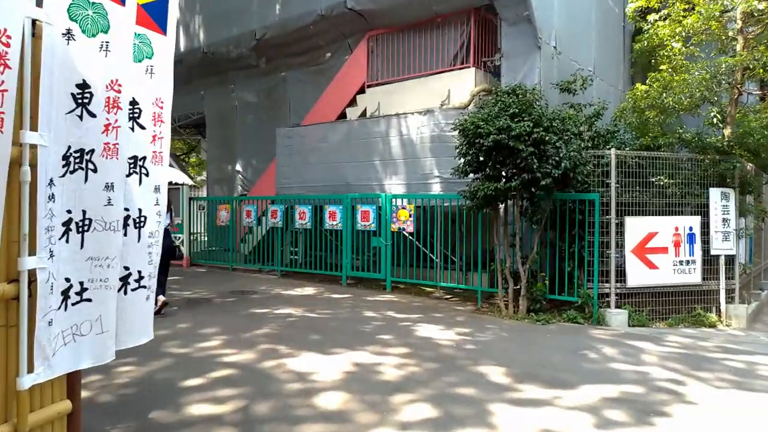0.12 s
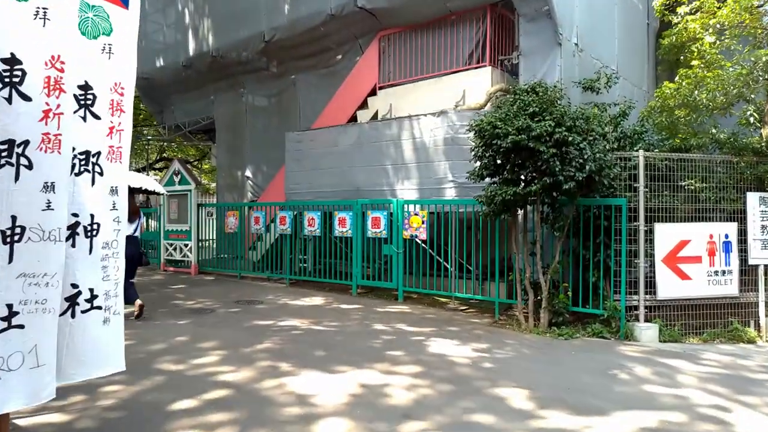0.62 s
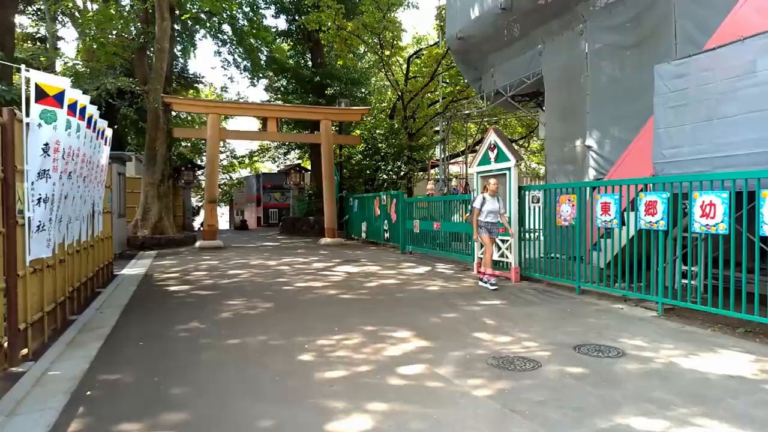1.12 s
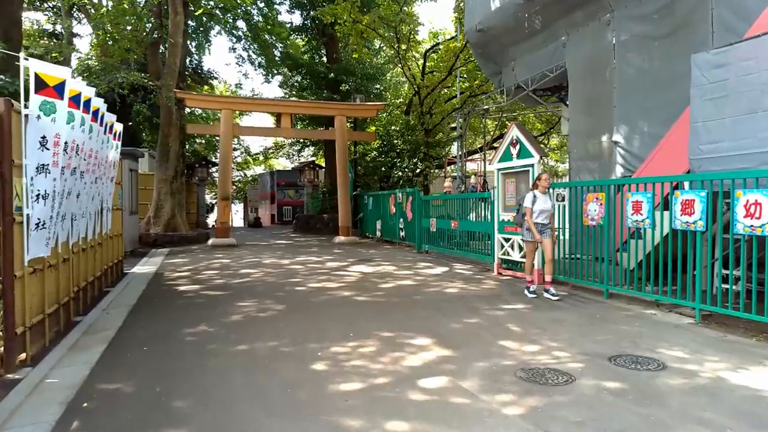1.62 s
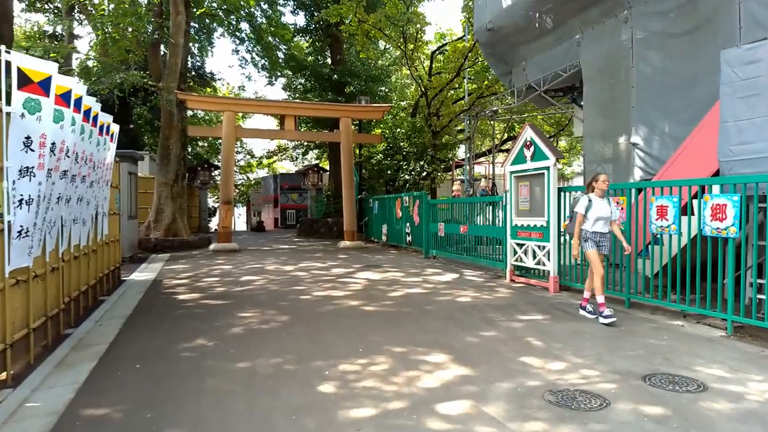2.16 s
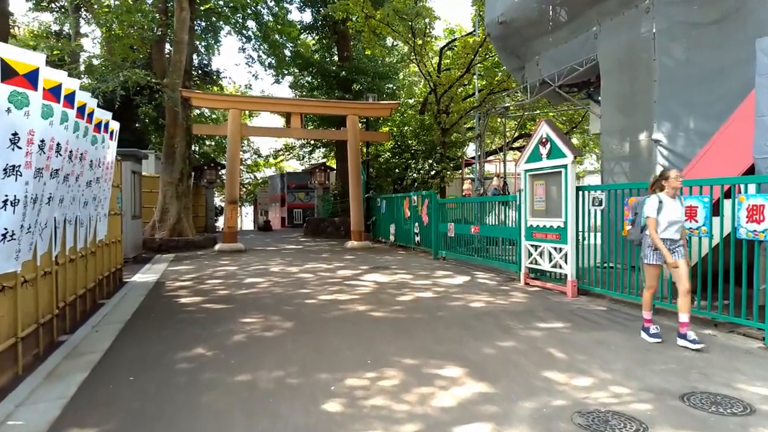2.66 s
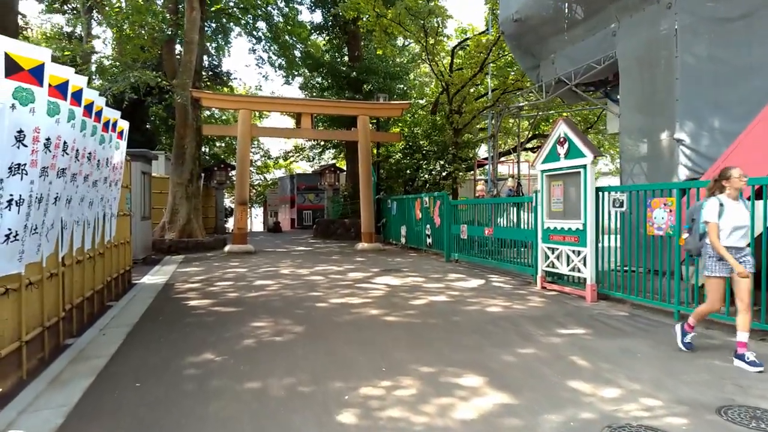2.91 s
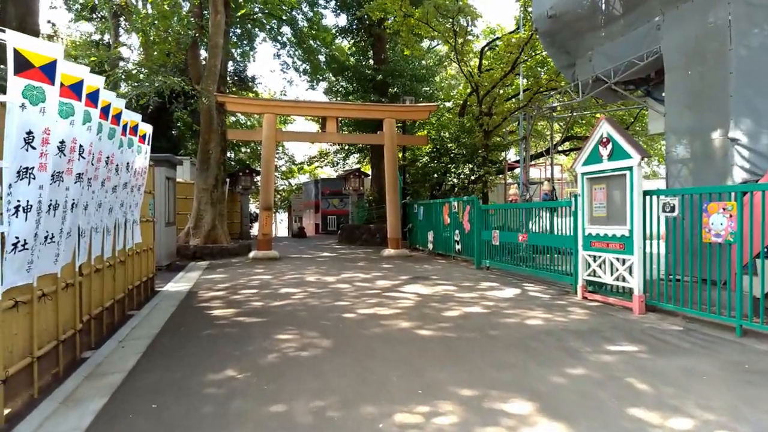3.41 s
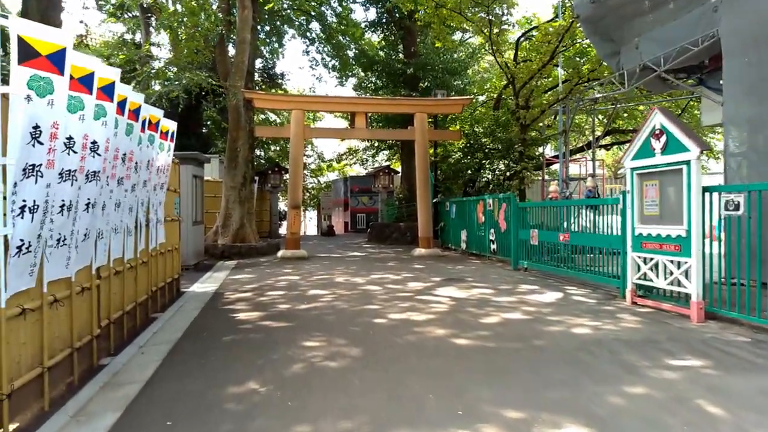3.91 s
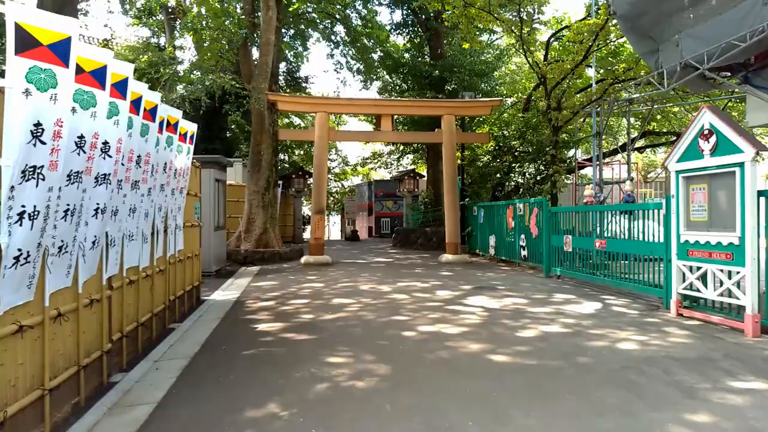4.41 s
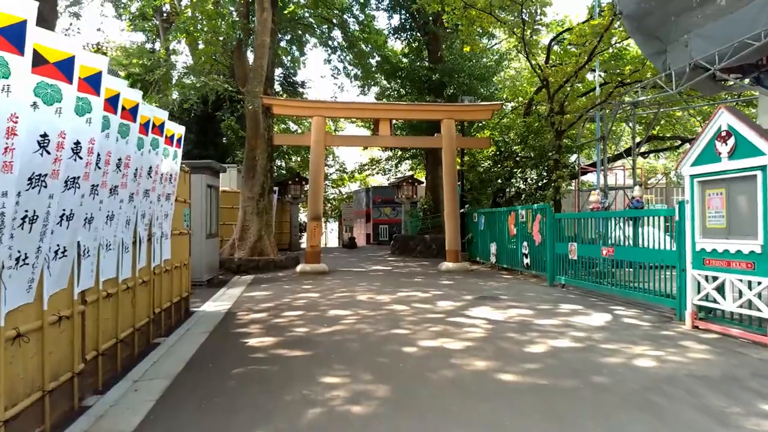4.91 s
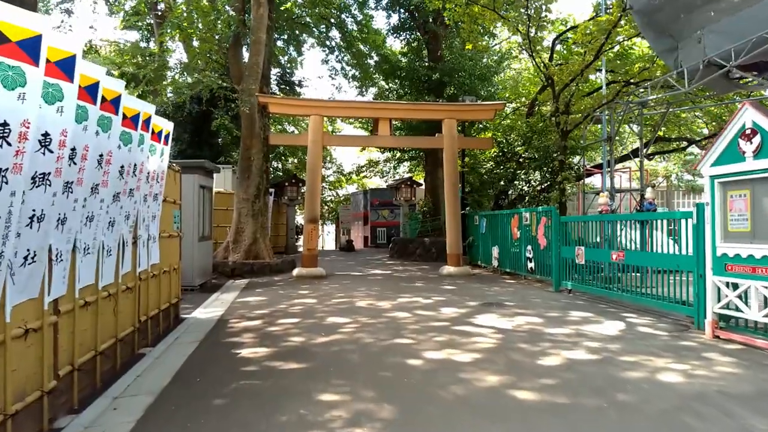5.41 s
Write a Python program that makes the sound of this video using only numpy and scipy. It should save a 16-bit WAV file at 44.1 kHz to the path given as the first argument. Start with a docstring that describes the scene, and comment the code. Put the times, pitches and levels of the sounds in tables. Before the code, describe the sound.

A dense cicada chorus sizzles in park trees, jumping louder and closer after a second, over faint low town rumble and soft footsteps.

```python
"""A shaded park: a cicada chorus in the trees, heard at two microphone ports.
Many far singers, as click-cycle noise puffs, blur into a sizzle with thin drifting partials; one nearer
singer throbs, others sing pitched notes as stacks of click harmonics. Below lie town rumble (shaped noise),
a fading hum (a sine) and soft steps (knocks and scuffs). At 1.15 s the listening place jumps closer to
the trees: the chorus steps up, and the throb and hum enter."""
import sys
import numpy as np
from scipy import signal
from scipy.fft import rfft, irfft, next_fast_len
from scipy.io import wavfile
from scipy.ndimage import uniform_filter1d

SR = 44100
rng = np.random.default_rng(int(sys.argv[2]) if len(sys.argv) > 2 else 0)


def natural_amplitude(level_db):
    """Convert a level in decibels to a linear amplitude factor, elementwise."""
    exponent = np.asarray(level_db, float) / 20
    return 10 ** exponent


def file_out(sig):
    """Save sig as 16-bit WAV at sys.argv[1]."""
    # one column per channel
    cols = np.atleast_2d(sig).T
    # limit, then scale
    lim = np.clip(cols, -1, 1)
    pcm = np.round(lim * 32767).astype(np.int16)
    wavfile.write(sys.argv[1], SR, pcm)


N = 243873
TIME = np.arange(N) / SR
SIZE = next_fast_len(N)
HZ = np.maximum(np.arange(SIZE // 2 + 1) * SR / SIZE, 1)
SIDES = np.array([[1], [-1]])  # left, right
JUMP_S = 1.15


def unit(x):
    """Scale to rms 1."""
    return x / np.sqrt(np.mean(x ** 2))


def along(table):
    """A table's second column as a curve in time."""
    return np.interp(TIME, [row[0] for row in table], [row[1] for row in table])


def over_hz(table):
    """A table's second column as a curve over log frequency."""
    return np.interp(np.log(HZ), np.log([row[0] for row in table]), [row[1] for row in table])


def shape(x, gain):
    """Filter by a gain per frequency."""
    return irfft(rfft(x, SIZE) * gain, SIZE)[..., :N]


def body(modes):
    """Summed gain of resonances, each halved in amplitude one width off centre."""
    return sum(natural_amplitude(db) / (1 + ((HZ - hz) / width_hz) ** 2) for hz, width_hz, db in modes)


def walk(rate_hz):
    """Random levels held 1 / rate_hz seconds and slewed twice."""
    hold = int(SR / rate_hz)
    held = np.repeat(rng.standard_normal(N // hold + 1), hold)
    return 1.3 * uniform_filter1d(uniform_filter1d(held, hold), hold)[:N]


def bursts(click_hz, decay_cycles):
    """Drum membrane buckling: a noise puff that dies away within each click cycle."""
    phase = (np.cumsum(click_hz) / SR + rng.random()) % 1
    return unit(np.exp(-phase / decay_cycles) * rng.standard_normal(N))


# town wash colour: (frequency [Hz], relative density [dB])
WASH_COLOUR = [(15, -50), (25, -30), (40, -7), (59, -1.5), (78, -9.5), (110, -6), (204, -12.5), (252, -13),
               (283, -16), (317, -14), (422, -18.5), (492, -21), (1040, -28), (1700, -31.5), (2400, -29),
               (3120, -30), (5280, -120)]
# idling drone bands: (centre [Hz], half-width [Hz], rms level before the swell [dB])
DRONES = [(61.2, 7.3, -47.5), (99, 6, -54.5), (181, 6.8, -60)]
# likeness of the ports: (frequency [Hz], left-right correlation [-1 to 1])
PORT_LIKENESS = [(60, 0.94), (130, 0.99), (290, 0.65), (640, 0.37), (1400, -0.09)]


def town():
    """Distant traffic: noise nearly the same in both ports in the bass, with idling drones that swell once."""
    wash_db, swell_db, swell_s, swell_width_s = -42, 5.5, 4.76, 0.25
    like = np.clip(over_hz(PORT_LIKENESS), -1, 1)
    colour = natural_amplitude(over_hz(WASH_COLOUR))
    mid, side = rng.standard_normal((2, N))
    wash = shape(mid, colour * np.sqrt(1 + like)) + SIDES * shape(side, colour * np.sqrt(1 - like))
    out = unit(wash) * natural_amplitude(wash_db + 0.34 * walk(3.09))
    drone_swell_db = swell_db * np.exp(-((TIME - swell_s) / swell_width_s) ** 2)
    for hz, width_hz, db in DRONES:
        drone = unit(shape(rng.standard_normal(N), body([(hz, width_hz, 0)])))
        out = out + drone * natural_amplitude(db + drone_swell_db)
    return out * natural_amplitude(SIDES * 0.5)


# spells of the hum: (start [s], length [s], level at start [dB], fall [dB/s])
HUM_SPELLS = [(1.152, 0.2, -48.5, 1), (1.15, 1.4, -46.5, 5.5), (3.55, 1.95, -54.5, -0.5)]


def hum():
    """A narrow low tone from the left: loud at the jump, it sinks, stops and comes back faintly."""
    jump_hz, rise_hz_per_s, fade_s = 307.4, 1.6, 0.068
    hz = jump_hz + rise_hz_per_s * (TIME - JUMP_S) + 0.39 * walk(7.8)
    phase = 2 * np.pi * np.cumsum(hz) / SR
    spells = np.zeros(N)
    for start_s, length_s, db, fall_db_per_s in HUM_SPELLS:
        fade = np.clip((start_s + length_s - TIME) / fade_s, 0, 1)
        spells += natural_amplitude(db - fall_db_per_s * (TIME - start_s)) * (TIME > start_s) * fade
    gain = np.sqrt(2) * spells * natural_amplitude(2.2 * walk(7.1))
    return gain * np.array([np.sin(phase), natural_amplitude(-5) * np.sin(phase + 1.3)])


# soft steps and taps: (time [s], level [dB], centre [Hz], scuff T60 [s], left minus right [dB])
CONTACTS = [(.16, -41, 900, 0.73, -1), (.601, -32, 850, 0.13, -1), (.697, -36, 845, .08, -6),
            (0.991, -41.5, 1000, 0.2, -13), (1.152, -35, 934, 0.42, -3), (1.29, -40.5, 960, 0.58, -5),
            (2.206, -33, 1420, .03, -9), (2.546, -39, 1110, 0.3, -6), (2.758, -37, 942, 0.069, -3),
            (3.967, -36, 900, .06, -5), (4.986, -33, 970, 0.14, -3), (5.36, -42, 1090, 0.25, -2)]


def steps():
    """Each contact is a damped resonant knock plus a dying scuff of noise around the same pitch."""
    crisp_t60_s = 0.03  # contacts this short are all knock; longer ones are mostly scuff
    knock_decay_s, scuff_rise_s = 0.0012, 0.0068
    out = np.zeros((2, N))
    t = np.arange(SR // 4) / SR
    f = np.arange(len(t) // 2 + 1) * SR / len(t)
    for time_s, db, hz, t60_s, pan_db in CONTACTS:
        crisp = min(crisp_t60_s / t60_s, 1)
        resonance = 1 / (1 + ((f - hz) / (0.36 * hz)) ** 2)
        scuff = unit(irfft(rfft(rng.standard_normal((2, len(t)))) * resonance, len(t)))
        scuff = scuff * (1 - np.exp(-t / scuff_rise_s)) * np.exp(-np.log(1000) * t / t60_s)
        knock = np.sin(2 * np.pi * hz * t) * np.exp(-t / knock_decay_s)
        contact = crisp * knock + (1 - crisp) * 0.44 * scuff
        i = int(time_s * SR)
        out[:, i:i + len(t)] += (contact * natural_amplitude(db + SIDES * pan_db / 2))[:, :N - i]
    return out


# pitched notes: (start [s], length [s], click rate at start [Hz], rise [Hz/s], partial level before body [dB])
SOLO_NOTES = [(.38, 0.37, 341, 39, -53.5), (0.552, 0.53, 363, 42, -50.5), (1.436, 0.22, 337.4, 41.5, -52),
              (1.66, 0.61, 338, 43, -49.5), (1.7, 0.52, 342.6, 12, -60), (2.3, 0.67, 344.5, -1, -54.5),
              (2.344, 0.41, 359, 17.5, -48.5), (2.902, 0.435, 359, 1, -48), (3.495, 0.25, 330, 50.5, -51),
              (4.33, 0.34, 339, 8, -51), (4.901, 0.35, 340, -0.5, -50.5)]
# soloist body: (centre [Hz], half-width [Hz], gain [dB])
SOLO_BODY = [(3720, 310, -7), (4300, 300, 4.5), (5030, 570, -0.5)]


def soloists():
    """Regular clicks ring the body as a stack of partials; echoes off leaves make each partial flicker."""
    orders = np.arange(8, 19)
    flicker = natural_amplitude(6.0 * np.array([[walk(18) for _ in orders] for _ in range(2)]))
    # the left port hears the notes first, the right one louder
    lag_s, gain = np.array([[0], [0.00036]]), natural_amplitude(-1.5 * SIDES)
    clicks = np.zeros((2, N))
    for start_s, length_s, click_hz, rise_hz_per_s, db in SOLO_NOTES:
        fade = np.clip(np.minimum(TIME - start_s, start_s + length_s - TIME) / 0.037, 0, 1)
        on = fade > 0
        rate_hz = (click_hz + rise_hz_per_s * (TIME - start_s)) * (1 + 0.0017 * walk(30))
        rate_hz = rate_hz[on]
        phase = 2 * np.pi * (np.cumsum(rate_hz) / SR - rate_hz.mean() * lag_s)
        train = sum(np.cos(k * phase) * flicker[:, i, on] for i, k in enumerate(orders))
        clicks[:, on] += train * fade[on] * natural_amplitude(db)
    return gain * shape(clicks, body(SOLO_BODY))


# click rate of the throbbing singer: (time [s], rate [Hz])
THROB_CLICK_RATE = [(1.15, 356), (1.9, 357), (2.7, 362.5), (3.3, 365.5), (4.6, 365.5), (5.53, 369.5)]
# throbbing singer's body: (centre [Hz], half-width [Hz], gain [dB])
THROB_MODES = [(6070, 640, 4.5), (8040, 550, -0.8), (14500, 910, -1.5)]
# lean of the singers, also for strands and chorus: (frequency [Hz], left minus right [dB])
PORT_LEAN = [(1800, -10), (3200, -7.5), (4000, -6.5), (5000, -0.5), (5800, -5), (7500, -1.5), (8300, 10),
             (10600, 13.5), (13000, 8.5), (15000, 0.5)]


def throbber():
    """A nearer singer, heard from the jump on, pumps its abdomen; regular clicks add thin partials."""
    pump_hz, partial_ripple, partials_db = 17.7, 0.3, -2.5  # partials relative to puffs
    jump_db, growth_db_per_s = -44, 0.6  # puff level; it grows as the listener walks nearer
    pump = 0.5 + 0.5 * np.cos(2 * np.pi * (pump_hz * TIME + 0.29))
    click_hz = along(THROB_CLICK_RATE) * (1 + 0.00147 * walk(25))
    phase = 2 * np.pi * np.cumsum(click_hz) / SR
    partials = np.array([sum(np.cos(k * phase) * natural_amplitude(4.4 * walk(9)) for k in range(14, 20))
                         for _ in range(2)])
    partials = partials * (1 + partial_ripple * pump)
    puffs = np.array([bursts(click_hz, decay_cycles=0.32) for _ in range(2)]) * pump ** 1.1
    colour = body(THROB_MODES) * natural_amplitude(SIDES * over_hz(PORT_LEAN) / 2)
    voice = unit(shape(puffs, colour)) + natural_amplitude(partials_db) * unit(shape(partials, colour))
    level_db = jump_db + growth_db_per_s * (TIME - JUMP_S) + 2.05 * walk(1.355)
    return voice * natural_amplitude(level_db) * (TIME > JUMP_S)


def chorus_db():
    """Chorus level: one step up at the jump."""
    far_db, near_db = -32.5, -30
    return np.where(TIME < JUMP_S, far_db, near_db)


# body of the middle-distance singers: (centre [Hz], half-width [Hz], gain [dB])
STRAND_MODES = [(5830, 660, 1.5), (4930, 500, -5.5), (7000, 550, -5)]


def strands():
    """Middle-distance singers click regularly, so thin partials drift in and out of the bright band."""
    out = np.zeros((2, N))
    for port in range(2):
        for _ in range(7):
            click_hz = rng.uniform(330, 380) * (1 + 0.012 * walk(1.5) + 0.003 * walk(40))
            phase = 2 * np.pi * np.cumsum(click_hz) / SR
            out[port] += natural_amplitude(3.0 * walk(7)) * sum(np.cos(k * phase) for k in range(13, 21))
    colour = body(STRAND_MODES) * natural_amplitude(SIDES * over_hz(PORT_LEAN) / 2)
    return unit(shape(out, colour)) * natural_amplitude(chorus_db() - 4)


# chorus colour: (frequency [Hz], relative density [dB])
CHORUS_COLOUR = [(1800, -36.5), (2500, -22.5), (3200, -12.5), (4000, -3.5), (5000, -3), (5800, 3),
                 (6500, -0.5), (7500, -4.5), (8300, -10), (9300, -18), (10600, -19.5), (13000, -14),
                 (15000, -8.5), (15400, -6), (15750, -5.5)]
# lift of the chorus flank below 4.5 kHz: (time [s], level [dB])
LOWER_FLANK_LIFT = [(0, 3), (.5, 0.5), (.7, 1.5), (1.3, 1.5), (2.0, -.8), (2.3, -0.4), (2.8, -4.5),
                    (3.1, -1.9), (3.8, 2), (4.5, 0), (5.3, -0.5), (5.53, -.6)]


def chorus():
    """Far singers: per port and band, noise puffs with their own click rate and wavering effort."""
    upper_gain_db, top_gain_db = 2, -0.5  # extra rise at the jump: 7-10 kHz, above 10 kHz
    out = np.zeros((2, N))
    far = TIME < JUMP_S
    lifts_db = [along(LOWER_FLANK_LIFT), 0, -upper_gain_db * far, -top_gain_db * far]
    for hz in 2000 * 2 ** np.arange(0, 3.1, 1 / 3):
        band = np.cos(np.pi / 2 * np.clip(3 * np.log2(HZ / hz), -1, 1))
        lift_db = lifts_db[np.searchsorted([4500, 7000, 10000], hz)]
        for port in range(2):
            effort_db = lift_db + 0.33 * walk(3.9) + (0.49 + hz / 12000) * walk(21.94)
            click_hz = rng.uniform(335, 375) * (1 + 0.01 * walk(2))
            sizzle = bursts(click_hz, decay_cycles=1.5)
            out[port] += shape(sizzle * natural_amplitude(effort_db), band)
    out = shape(out, natural_amplitude(over_hz(CHORUS_COLOUR) + SIDES * over_hz(PORT_LEAN) / 2))
    return unit(out) * natural_amplitude(chorus_db())


def scene():
    """All sources at the two ports."""
    return town() + hum() + steps() + soloists() + throbber() + strands() + chorus()


def top_cut(x):
    """Nothing passes above the cut-off."""
    return signal.sosfilt(signal.butter(12, 17090, fs=SR, output="sos"), x)


def record(dry):
    """Port response: bass roll-off, cut top and a deep null in the right port."""
    top_hz, bass_hz, null_hz, null_width_hz = 15750, 37, 9350, 520
    null = 1 - np.exp(-((HZ - null_hz) / null_width_hz) ** 4 / 2)
    band = (HZ < top_hz) / (1 + (bass_hz / HZ) ** 6)
    mix = shape(dry, band * np.array([np.ones_like(HZ), null]))
    return top_cut(mix)


dry = scene()
out = record(dry)
file_out(out)
```